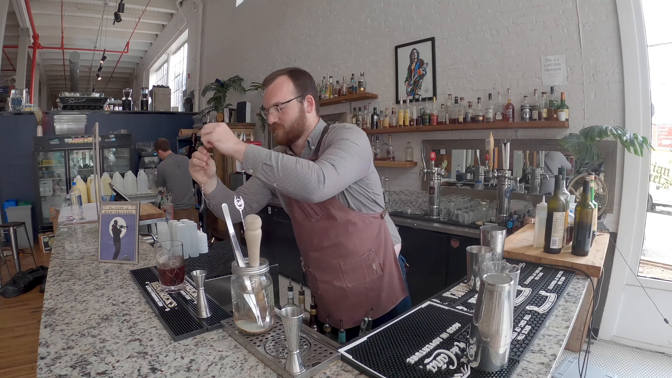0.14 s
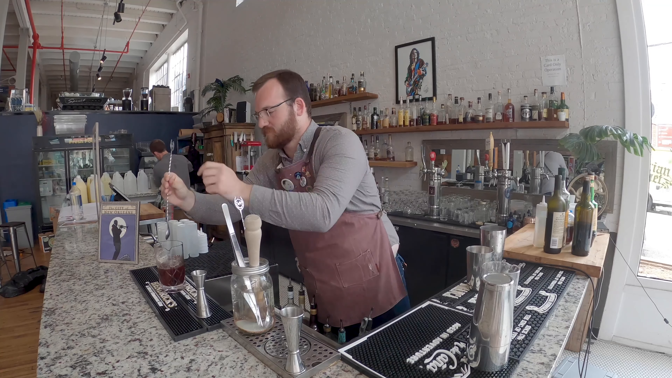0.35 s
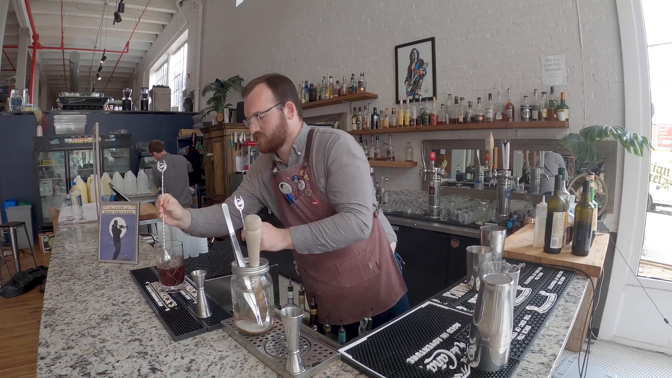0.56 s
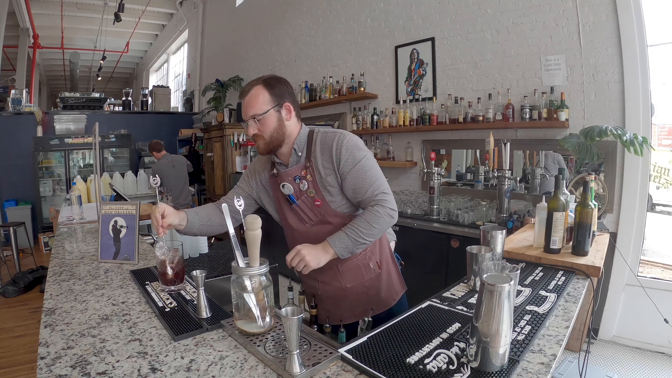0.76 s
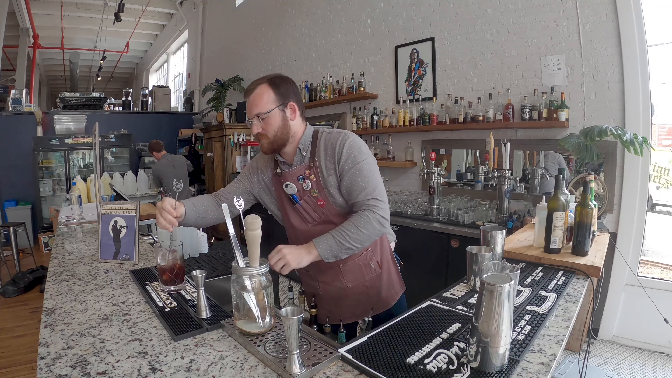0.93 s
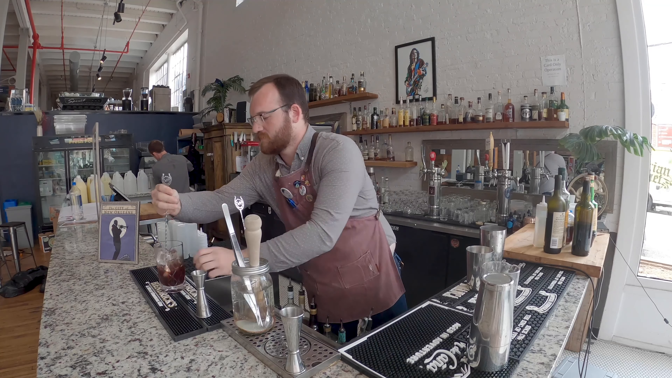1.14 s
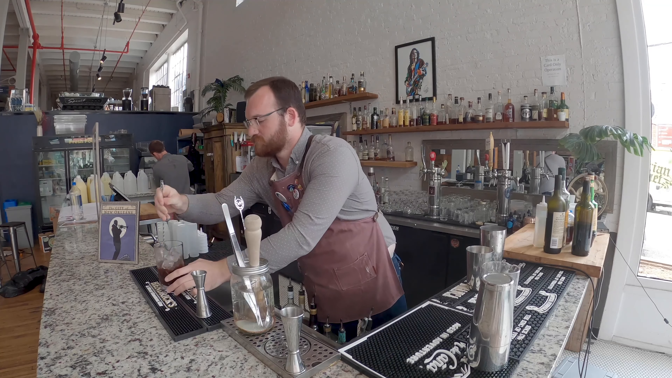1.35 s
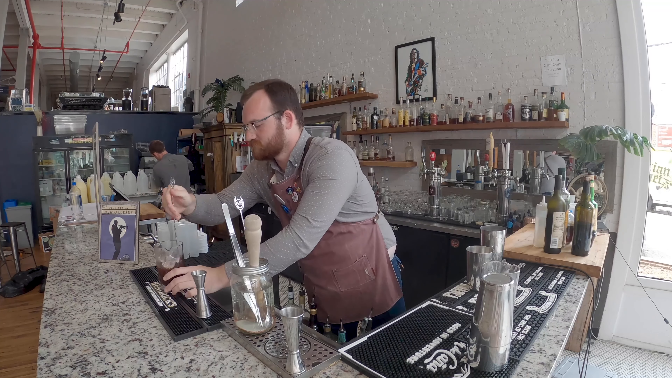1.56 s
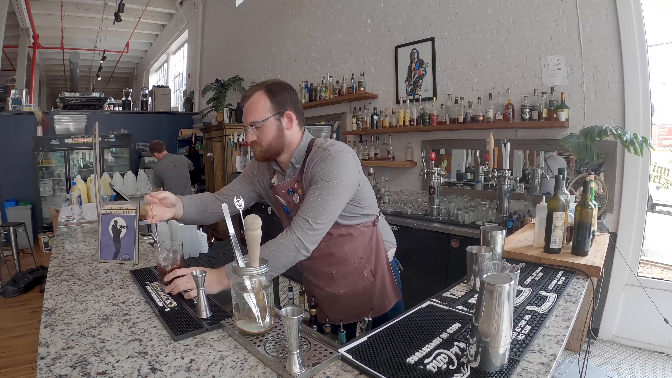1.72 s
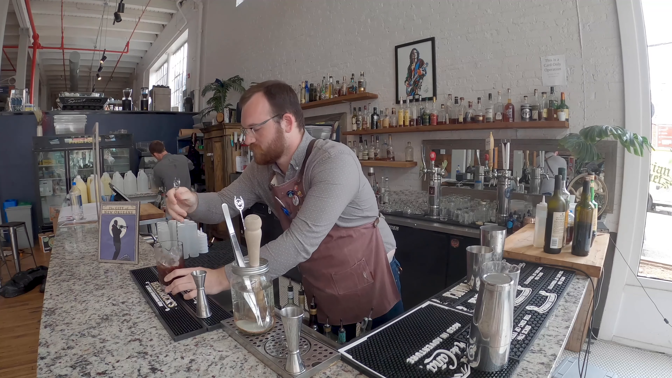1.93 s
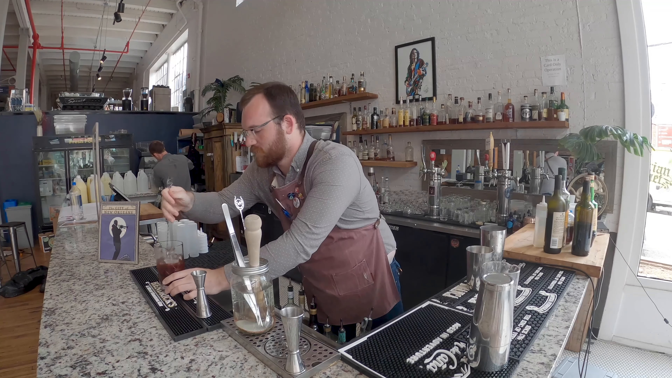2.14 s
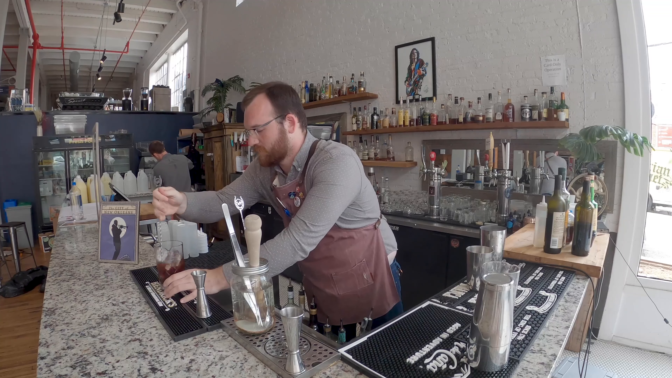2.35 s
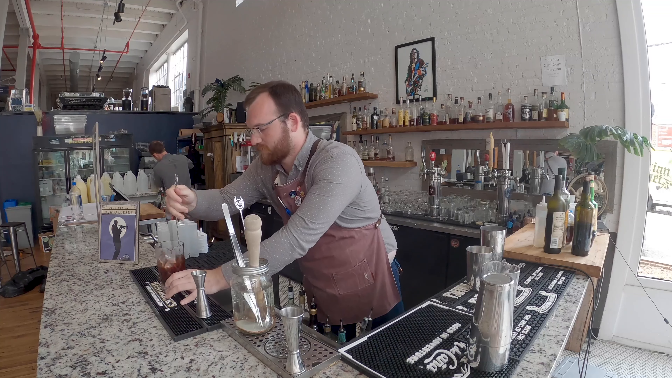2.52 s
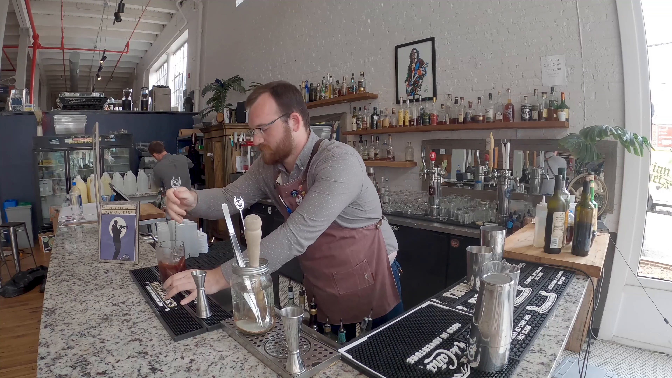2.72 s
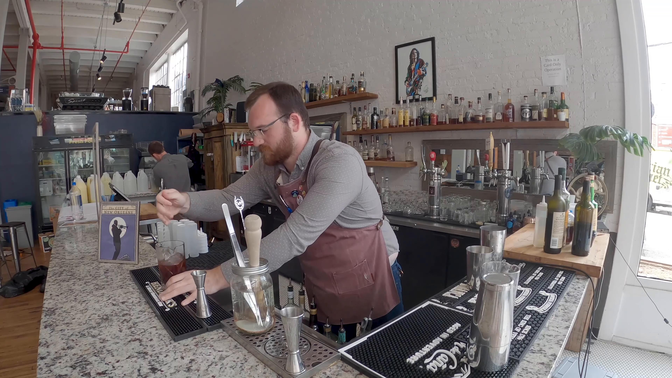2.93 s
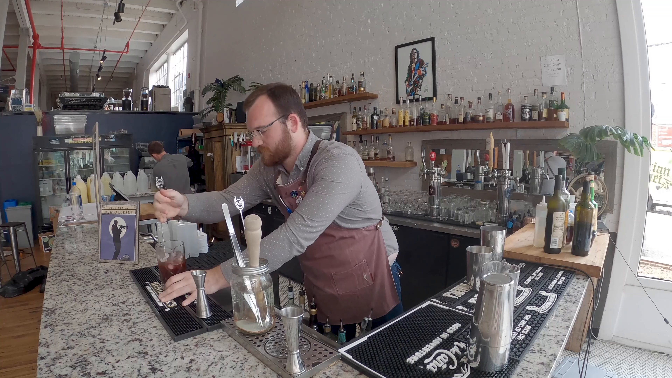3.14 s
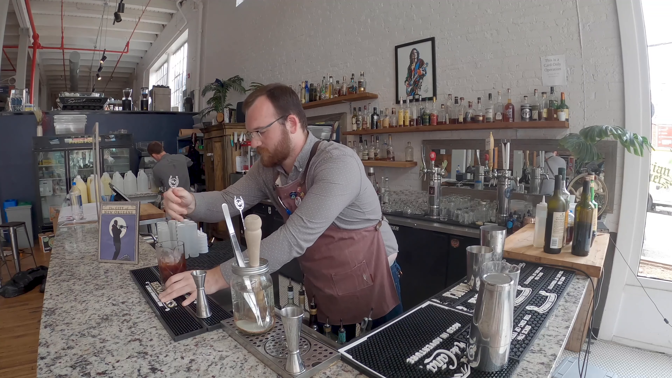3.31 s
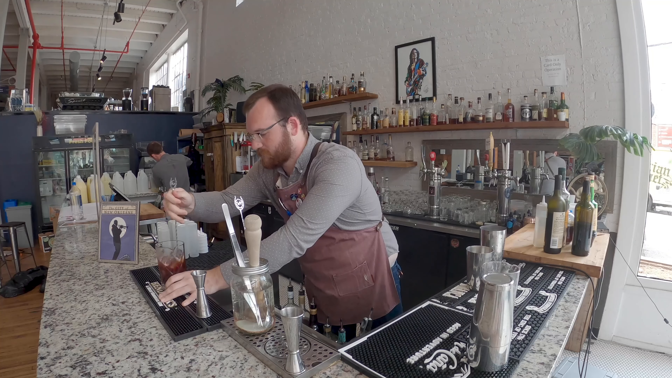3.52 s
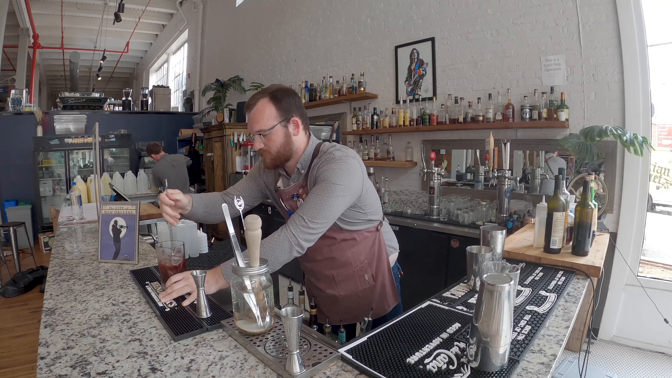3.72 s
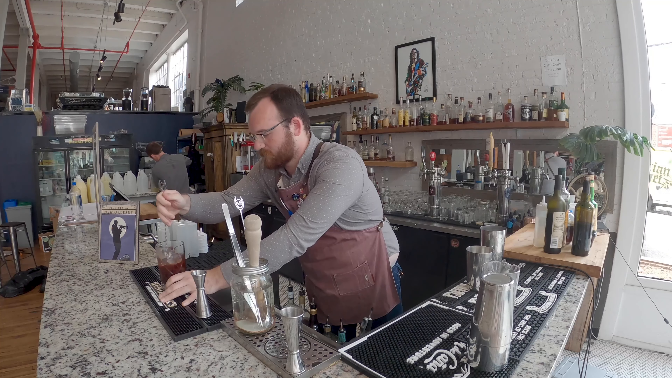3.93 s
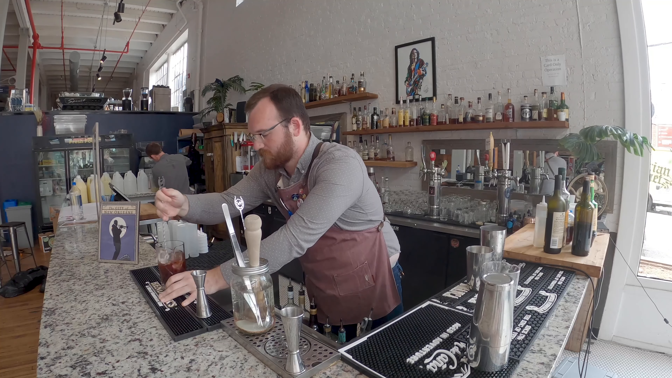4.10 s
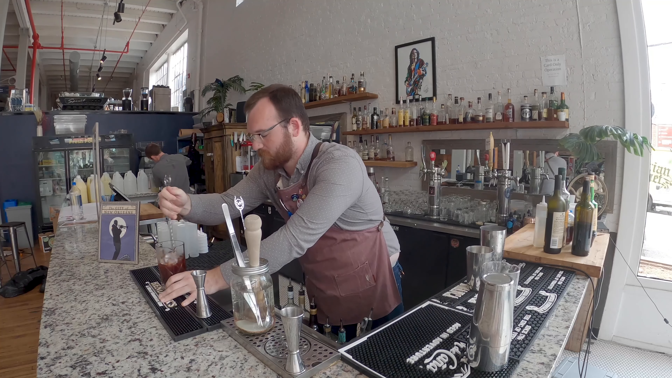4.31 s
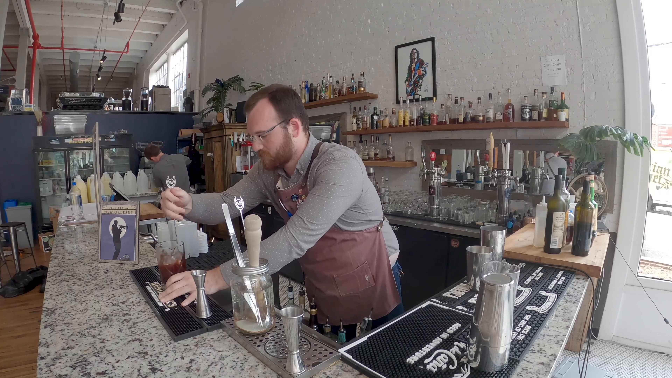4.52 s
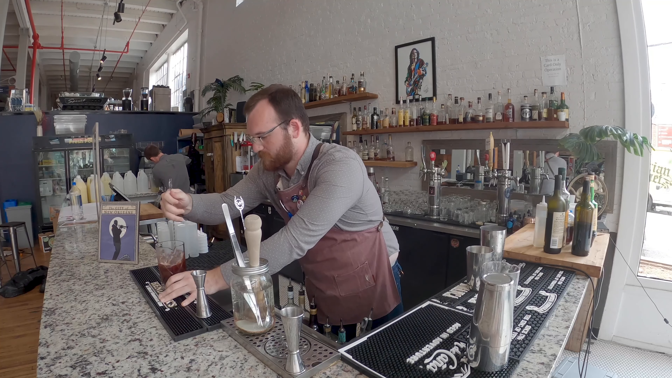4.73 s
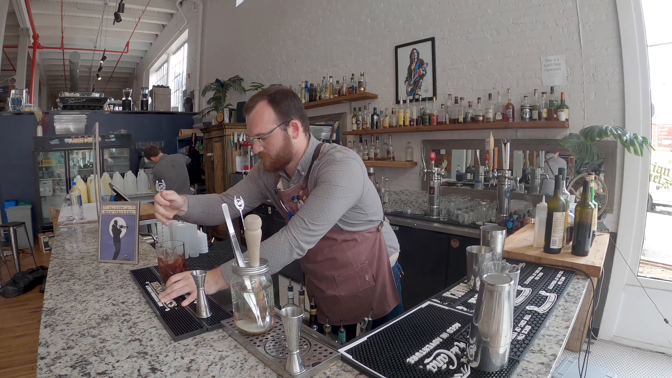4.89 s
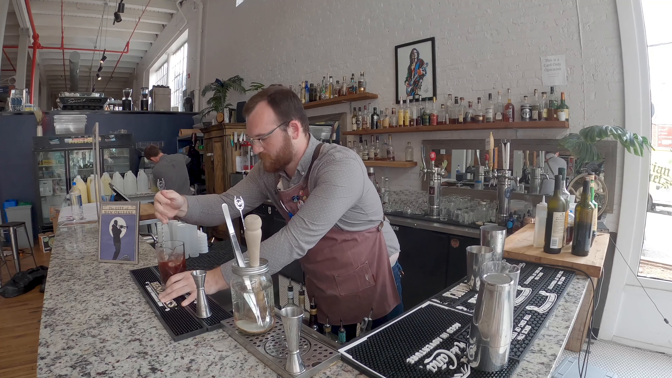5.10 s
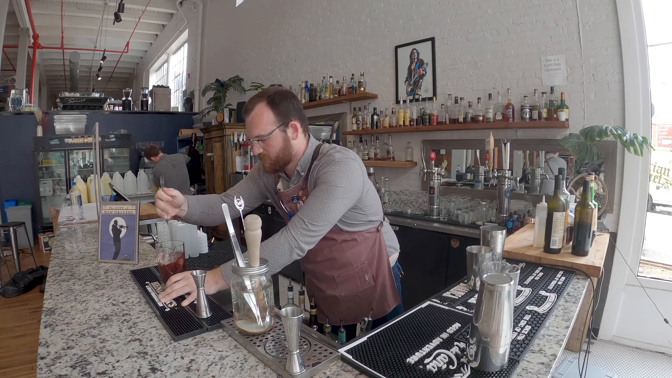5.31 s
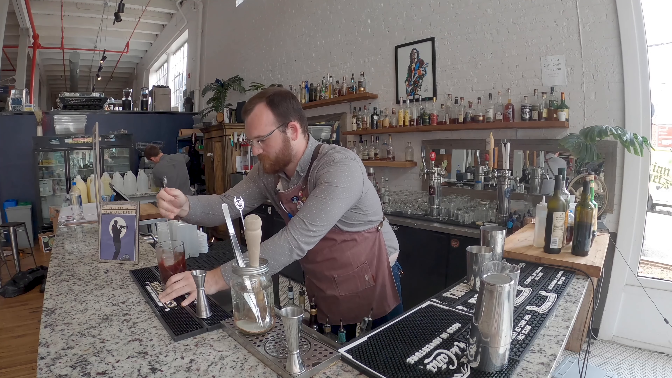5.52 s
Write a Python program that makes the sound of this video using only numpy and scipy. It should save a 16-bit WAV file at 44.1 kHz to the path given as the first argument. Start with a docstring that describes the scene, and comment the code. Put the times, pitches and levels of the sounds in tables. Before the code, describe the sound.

Near silence with a faint spoon ring, then a bright tap on glass and a dense, brittle crunch of ice with a hollow plunk. A brief lull leads into stirring: light, wet, glassy clacks that grow busier and faster, to about four turns a second. Close microphone, short lively room reflections, little bass, low hum near the end.

```python
"""A bar at night-quiet level, microphone close to a mixing glass: a held bar spoon sings faintly at first.
It clinks into the glass, pushes the ice down with a plunk, then stirs, speeding up to about four turns a second.
Noise bursts and struck modes make the cubes knock and ring the glass, lower as the swirling drink climbs its wall.
Small bubbles chirp in the swirl, a hard-walled room answers with decaying noise, and a low hum swells near the end."""
import sys
import numpy as np
from scipy import signal
from scipy.fft import rfft, irfft, next_fast_len
from scipy.io import wavfile
from scipy.ndimage import map_coordinates

SR = 44100
rng = np.random.default_rng(int(sys.argv[2]) if len(sys.argv) > 2 else 0)


def wrap_up_sound(samples):
    """Save the sound to the file named by the first command line argument, as 16-bit audio."""
    columns = np.atleast_2d(samples).T
    # keep every value between -1 and 1, then stretch to whole-number steps
    tamed = np.clip(columns, -1, 1)
    steps = np.round(tamed * 32767).astype(np.int16)
    wavfile.write(sys.argv[1], SR, steps)


N = 244843
T = np.arange(SR // 10) / SR  # time axis of one contact, s
STRIKE = SR // 83  # samples in the first 12 ms of a contact
SPOON_AT = 0.614  # the spoon enters the glass, s
PLUNGE_AT = 0.935  # the push on the ice is at its strongest, s


def amp(db):
    """Decibels to gain."""
    return 10 ** (np.asarray(db) / 20)


def unit(x, count=None):
    """Scale to rms 1 over the first count samples."""
    return x / np.sqrt(np.mean(x[:count] ** 2) + 1e-20)


def along(points, hz):
    """Read (Hz, value) points on a log frequency axis."""
    f, v = np.transpose(points)
    return np.interp(np.log(hz + 1), np.log(f), v)


def curve(points, t):
    """Read (s, value) points at times t."""
    s, v = np.transpose(points)
    return np.interp(t, s, v)


def fade(t60, t=T):
    """Decay by 60 dB in t60 seconds."""
    return np.exp(-np.log(1000) * t / t60)


def coloured(x, gain):
    """Causal (minimum-phase) filter with the given gain of frequency."""
    m = 2 * next_fast_len(len(x) * 2 // 3)
    log_gain = np.log(np.maximum(gain(np.fft.rfftfreq(m, 1 / SR)), 1e-5))
    cepstrum = irfft(log_gain)
    # folding the cepstrum onto positive time makes the filter causal
    cepstrum[1:m // 2] *= 2
    cepstrum[m // 2 + 1:] = 0
    response = np.exp(rfft(cepstrum))
    return irfft(rfft(x, m) * response, m)[:len(x)]


def band(hz, lo_hz, hi_hz, order=8):
    """Gain of a band-pass; a higher order has steeper sides."""
    low_side = 1 + (lo_hz / (hz + 1)) ** (2 * order)
    high_side = 1 + (hz / hi_hz) ** (2 * order)
    return 1 / np.sqrt(low_side * high_side)


def tone(hz, t60, attack, glide=0):
    """One decaying mode, attack in seconds; glide is its relative rise in pitch per second."""
    wave = np.sin(2 * np.pi * hz * (T + glide * T ** 2 / 2))
    return unit(wave * fade(t60) * (1 - np.exp(-T / attack)), count=STRIKE)


def add(track, s, sound):
    """Mix a sound into a track at time s."""
    part = track[max(round(s * SR), 0):][:len(sound)]
    part += sound[:len(part)]


# Spectrum of the quiet room. Each row: frequency in Hz, relative level in dB.
AIR_SPECTRUM = [(15, -18), (25, -13.5), (113, -7.5), (271, -12.5), (344, -13), (382, -15.5), (14000, -38)]
# Swell of the low hum. Each row: time in seconds, level in dB before the trim and the waver.
HUM_SWELL = [(2.8, -73), (3.23, -70), (4.62, -68), (4.71, -53), (4.83, -61.5), (5.29, -51.5), (5.36, -42.5),
             (5.5, -46.5)]
HUM_HZ, HUM_WAVER_HZ = 97, 2  # centre pitch; size of its random drift
BRIEF_HUM_AT, BRIEF_HUM_S, BRIEF_HUM_HZ, BRIEF_HUM_DB = 2.88, 0.071, 163, -57.5


def background(air_db=-66, hum_trim_db=-2, waver_db=1.5):
    """Steady room noise, a low hum that wavers in pitch and level, and a higher one that comes and goes."""
    t = np.arange(N) / SR
    air = unit(coloured(rng.standard_normal(N), lambda hz: amp(along(AIR_SPECTRUM, hz))))
    # ten random knots a second, joined smoothly
    drift, waver = [map_coordinates(knots, [t * 10]) for knots in rng.standard_normal((2, 64))]
    hum = np.sqrt(2) * np.sin(2 * np.pi * np.cumsum(HUM_HZ + HUM_WAVER_HZ * drift) / SR)
    hum_level = amp(curve(HUM_SWELL, t) + hum_trim_db + waver_db * waver)
    brief_level = amp(BRIEF_HUM_DB) * np.exp(-((t - BRIEF_HUM_AT) / BRIEF_HUM_S) ** 2)
    brief = brief_level * np.sin(2 * np.pi * BRIEF_HUM_HZ * t)
    return amp(air_db) * air + brief + hum_level * hum


# Decay of the hard-walled bar. Each row: frequency in Hz, t60 in seconds.
ROOM_DECAY = [(700, 0.51), (1400, 0.72), (3000, 0.43), (7000, 0.6), (12000, 0.32)]


def room(x, gap=0.006, count=14):
    """Diffuse echo of the bar as decaying noise, drawn afresh for each stretch of sound."""
    out = np.zeros(N)
    edges = np.linspace(0, N, count + 1).astype(int)
    for a, b in zip(edges, edges[1:]):
        hz, t, z = signal.stft(rng.standard_normal(SR), SR, nperseg=256)
        decay = fade(along(ROOM_DECAY, hz)[:, None], t)
        tail = signal.istft(z * decay, SR, nperseg=256)[1]
        add(out, a / SR + gap, signal.fftconvolve(x[a:b], tail / np.linalg.norm(tail)))
    return out


# The spoon's own modes, singing in the hand. Each entry: frequency in Hz.
HELD_MODES = [2660, 3590]


def held_spoon(level_db=-65, t60=0.92):
    """The steel spoon in the hand rings out faintly from the start, as decaying sines."""
    t = np.arange(N) / SR
    return amp(level_db) * fade(t60, t) * sum(np.sin(2 * np.pi * hz * t) for hz in HELD_MODES)


# The drink climbing the wall. Each row: time in seconds, height from 0 to 1.
DRINK_HEIGHT = [(1.9, 0.18), (2.9, 0.45), (4.2, 0.83), (5.5, 0.92)]
# The drink loads the glass; rows are low wall mode, high wall mode and deepest knock.
# Each row: frequency at rest in Hz, frequency at full swirl in Hz.
GLASS_LOADING = [(2626, 2570), (4713, 4335), (1367, 830)]
PLUNGE_DEEPENS, PLUNGE_S = 0.503, 0.204  # share by which the knock drops in the push; width of that dip, s
# the moving drink wets the ice and dulls its snap: dB over the crack, before the hardness lift
DRY_SNAP_DB, WET_SNAP_DB, WET_AT, WETTING_S = -13.5, -22, 1.4, 0.39
SWIRL_SNAP_DB = 1  # rise of the snap at full swirl


def swirl(s):
    """Low and high wall mode, deepest knock (Hz) and snap (dB) as the drink stands at time s."""
    rest, full = np.transpose(GLASS_LOADING)
    height = curve(DRINK_HEIGHT, s)
    low_hz, high_hz, deep_hz = rest + (full - rest) * height
    deep_hz *= 1 - PLUNGE_DEEPENS * np.exp(-((s - PLUNGE_AT) / PLUNGE_S) ** 2)
    wet = np.clip((s - WET_AT) / WETTING_S, 0, 1)
    snap_db = DRY_SNAP_DB + (WET_SNAP_DB - DRY_SNAP_DB) * wet + SWIRL_SNAP_DB * height
    return low_hz, high_hz, deep_hz, snap_db


# Each turn of the spoon shoves the small cubes along. Each row: start in seconds, activity in dB.
SPOON_TURNS = [(1.369, -42.5), (1.76, -42.5), (2.08, -40.5), (2.40, -40), (2.70, -41.5), (2.96, -44.5),
               (3.22, -42.5), (3.46, -45.5), (3.73, -40), (3.94, -38.5), (4.18, -39.5), (4.42, -37.5),
               (4.67, -40), (4.92, -43), (5.15, -38), (5.39, -41)]
PLUNGE_DB, PLUNGE_RISE_DB_PER_S, PLUNGE_FALL_DB_PER_S = -26, 72, 102
SHOVE_SAG_DB, SHOVE_SAG_POWER = 16, 3  # drop by the end of a turn; a higher power holds the shove longer


def busy(s):
    """How hard the ice is moving at time s (dB): the push swells and dies; each turn is a shove that sags."""
    starts, db = np.transpose(SPOON_TURNS)
    if s < starts[0]:
        return PLUNGE_DB - max(PLUNGE_RISE_DB_PER_S * (PLUNGE_AT - s), PLUNGE_FALL_DB_PER_S * (s - PLUNGE_AT))
    k = np.searchsorted(starts, s, side="right") - 1
    length = np.diff(starts)[min(k, len(starts) - 2)]
    return db[k] - SHOVE_SAG_DB * ((s - starts[k]) / length) ** SHOVE_SAG_POWER


def bubbles(level_db=-4, glide=3.1, spread=0.16, count=22):
    """The swirl folds in small bubbles, which rise in pitch as they surface."""
    out = np.zeros(N)
    for place, size in rng.random((count, 2)):
        s = SPOON_AT + place * (N / SR - SPOON_AT)
        deep_hz = swirl(s)[2]
        hz = deep_hz * np.exp(spread * (1 + 2 * size))
        add(out, s, amp(busy(s) + level_db) * tone(hz, t60=0.056, attack=0.0024, glide=glide))
    return out


def burst(gain, t60, pitched, hold=0.0064, cube_t60=0.034):
    """Dense micro-impacts as noise; a pitched share rings at two pitches the cube picks from the spectrum."""
    chatter = coloured(rng.standard_normal(len(T)) * fade(t60, np.maximum(T - hold, 0)), gain)
    hz = np.fft.rfftfreq(len(T), 1 / SR)
    power = np.cumsum(gain(hz) ** 2)
    pitches = np.interp(rng.random(2), power / power[-1], hz)  # likelier where the spectrum is strong
    cube = sum(tone(f, cube_t60, attack=0.0005) for f in pitches)
    return np.sqrt(1 - pitched) * unit(chatter, count=STRIKE) + np.sqrt(pitched) * unit(cube, count=STRIKE)


def snap(db, hardness=0.18, edge_hz=9000, droop_db=5):
    """A short, bright click of treble noise; harder blows carry more of it."""
    def gain(hz):
        return band(hz, edge_hz, SR) * amp(-droop_db * np.log2(1 + hz / edge_hz))
    click = coloured(rng.standard_normal(len(T)) * fade(0.046), gain)
    return amp(db + hardness * (db + 75)) * unit(click, count=STRIKE)


# Ice and drink resonating in the glass. Each row: centre in Hz, width in Hz, relative level in dB.
GLASS_CAVITY = [(809, 145, -4), (986, 51, -9.5), (1425, 82.3, -0.5), (1924, 56.6, 3.5), (2319, 57.6, 3.5)]


def cavity(hz):
    """Gain of the resonances of the filled glass, their powers summed."""
    power = 0
    for centre, width, db in GLASS_CAVITY:
        power = power + amp(2 * db) / (1 + (2 * (hz - centre) / width) ** 2)
    return np.sqrt(power)


# Cube on wall. Each row: frequency in Hz, relative level in dB.
WALL_CLACK = [(2000, -18), (2600, 2.5), (3000, 3), (3600, -15.5), (4000, -6.5), (4500, 1), (5200, -17),
              (6000, -25)]
# Brittle ice. Each row: frequency in Hz, relative level in dB.
ICE_CRACK = [(4200, -25), (5000, -4), (5800, 1.5), (7300, -7.5), (8600, -12.5), (10500, -29.5)]


def clink(s, knock_db, low_db, high_db, crack_db, clean_db=6, scatter=0.0275, size_scatter=0.0563,
          pitched=0.62, ring_t60=0.031, clean_t60=0.031):
    """One contact knocks the filled glass, rings its two wall modes and cracks in the treble."""
    low_hz, high_hz, deep_hz, snap_db = swirl(s)
    size = np.exp(size_scatter * rng.standard_normal())  # every cube sounds at its own pitch
    knock = burst(lambda hz: cavity(hz * size) * band(hz, deep_hz, 2330), t60=0.095, pitched=pitched)
    crack = burst(lambda hz: amp(along(ICE_CRACK, hz * size)), t60=0.025, pitched=pitched / 2)
    out = amp(knock_db) * knock + amp(crack_db) * crack
    for db, mode_hz, lo_hz, hi_hz in [(low_db, low_hz, 2350, 3500), (high_db, high_hz, 3500, 5150)]:
        # a clean blow on the wall rings; cube against cube only clacks
        ringing = 1 / (1 + amp(2 * (max(knock_db, crack_db) + clean_db - db)))
        ring_hz = mode_hz * (1 + scatter * (1 - ringing / 2) * rng.standard_normal())
        ring = tone(ring_hz, ring_t60 + clean_t60 * ringing, attack=0.0012)
        clack = burst(lambda hz: amp(along(WALL_CLACK, hz * size)) * band(hz, lo_hz, hi_hz),
                      t60=0.032, pitched=pitched)
        out += amp(db) * (np.sqrt(ringing) * ring + np.sqrt(1 - ringing) * clack)
    return out + snap(crack_db + snap_db)


def jostle(rate=60, level_db=-4.0, spread_db=7.5, colour_db=(-6, -2, -5, -12)):
    """Many faint contacts a second between the distinct ones, as strong as the ice is busy."""
    out = np.zeros(N)
    count = int(rate * (N / SR - SPOON_AT))
    for k, (place, *colour) in enumerate(rng.random((count, 5))):
        s = SPOON_AT + (k + place) / rate
        db = busy(s) + level_db + spread_db * (2 * np.array(colour) - 1)
        add(out, s, clink(s, *(db + colour_db)))  # knock, low mode, high mode, crack
    return out


# The steel spoon strikes the still glass going in. Each row: frequency in Hz, level in dB, t60 in seconds.
SPOON_STRIKE = [(2695, -24.5, 0.041), (4700, -20, 0.077), (7180, -32, 0.033), (10500, -40, 0.039)]
# Distinct contacts of spoon, ice and glass. Each row: start in seconds, strength in dB, hardness in dB,
# knock of the filled glass in dB over the strength.
CONTACTS = [(0.0385, -66.5, 15.5, 11), (0.147, -53, 6, -16), (0.614, -27, 9.5, -10.5),
            (0.7386, -42.5, 6, 5), (0.761, -38, 9.5, 5.5), (0.7761, -41.5, 7, 1.5), (0.8631, -37.5, 3, 0.5),
            (0.878, -35.5, 4.5, -17), (0.8966, -28.5, -1, -14), (0.9102, -32, 7, -8),
            (0.9209, -20, 6, -6.5), (0.9326, -28.5, 7, 1), (0.9603, -30.5, 5, -1), (0.9776, -25.5, 1.5, -3),
            (1.055, -31, 9, -2), (1.332, -53, 9, 3.5), (1.3586, -43.5, 0, -0.5), (1.3787, -42, 15.5, 8.5),
            (1.5291, -50.5, 27, 6), (1.548, -35, 13, -3.5), (1.6147, -40, 9.5, -4.5),
            (1.709, -44.5, -6.5, -3), (1.7893, -39, -3, -1.5), (1.844, -48.5, 15, -9),
            (1.9089, -39.5, -15, -16), (1.925, -42.5, 0, -1), (2.0008, -46, -8, 8), (2.046, -50, -12, 10.5),
            (2.08, -28.5, -16.5, -14.5), (2.1104, -35, -13, -11), (2.1705, -34.5, -13.5, -8),
            (2.2543, -52, 6, 14), (2.41, -38, 1.5, -4.5), (2.4846, -35.5, -16, -6), (2.5502, -34, 1.5, -11),
            (2.6054, -37.5, -5.5, -8), (2.656, -47, 9, -3.5), (2.719, -38.5, 7, -0.5),
            (2.7613, -31.5, -4.5, -4), (2.7724, -35.5, -30, -23), (2.834, -40.5, -19, -4),
            (2.8845, -29.5, 2.5, -10), (2.8967, -30.5, -1, -12.5), (2.962, -34.5, 4.5, -2),
            (3.053, -48.5, 15.5, 2), (3.1142, -36, -6, -0.5), (3.222, -44, 1.5, 3.5),
            (3.2512, -40, 18.5, -14), (3.3853, -41, -10, 1.5), (3.464, -29, 6, -10.5),
            (3.5182, -40, 7, -3.5), (3.548, -35.5, 4, -2), (3.7033, -30, 3.5, -16.5), (3.765, -38, 1, -13),
            (3.8019, -26.5, -5, -11.5), (3.9, -43, 1, 6.5), (3.9736, -31.5, 2, -13), (3.9861, -38.5, 4, -9),
            (4.0341, -35.5, -3.5, -2), (4.0704, -41, -6, 3), (4.173, -27.5, -7, -10), (4.203, -34, 0, -3),
            (4.2117, -36, 4, -2.5), (4.2461, -34, 8.5, -7), (4.298, -38.5, -0.5, 1), (4.4008, -39, -13, -1),
            (4.428, -49, 14, -6), (4.454, -32.5, -2, -14), (4.4649, -28, -3.5, -7), (4.666, -45.5, 9, -2),
            (4.6757, -36, -9, -3), (4.7032, -33.5, 10, -20), (4.7524, -35, -4, -2),
            (4.783, -20.5, -3.5, -10), (4.8389, -33, -5, -3), (4.9359, -34, -1.5, -9.5),
            (4.9704, -32.5, 7, -6.5), (5.01, -32.5, -4.5, -4.5), (5.068, -33.5, 2, -4),
            (5.1489, -28.5, 0, -10.5), (5.1772, -32.5, -8.5, -5), (5.193, -31, 3.5, -4),
            (5.3906, -37, 5.5, -6), (5.4094, -33.5, -8, -3), (5.4228, -32, 3.5, -13),
            (5.447, -36.5, 0, -3.5)]
# A contact's share in the low wall mode, the high wall mode and the crack.
# Each row: level in dB over its strength, slope in dB per dB of hardness.
CONTACT_SHARES = [(0.5, -0.27), (-3, 0.6278), (-9, 1)]
# Air pockets ringing in the drink. Each row: start in seconds, frequency in Hz, level in dB before the trim,
# t60 in seconds.
AIR_POCKETS = [(.924, 731, -33, 0.13), (.935, 863, -21.5, 0.053), (2.186, 2270, -24, 0.024),
               (2.413, 2257, -31.5, 0.035), (3.121, 1337, -35.5, 0.055), (4.546, 1330, -43, 0.035),
               (4.91, 1300, -38, 0.03), (5.232, 777, -40, 0.063)]


def ice(plunk_trim_db=-1, rebound_db=-16, rebound_gap=0.016, rebound_top_db=-33):
    """The spoon's entry, distinct contacts with a rebound each, and air pockets the cubes drag under."""
    out = np.zeros(N)
    add(out, SPOON_AT, sum(amp(db) * tone(hz, t60, attack=0.00126) for hz, db, t60 in SPOON_STRIKE))
    for s, strength_db, hardness_db, knock_db in CONTACTS:
        levels = [strength_db + knock_db]
        levels += [strength_db + db + slope * hardness_db for db, slope in CONTACT_SHARES]
        add(out, s, clink(s, *levels))
        # the drink brakes the cube, so even a hard blow comes back softly
        later = s + rebound_gap * (0.5 + 2 * rng.random())
        add(out, later, amp(rebound_db) * clink(later, *np.minimum(levels, rebound_top_db)))
    for s, hz, db, t60 in AIR_POCKETS:
        add(out, s, amp(db + plunk_trim_db) * tone(hz, t60, attack=0.011))
    return out


def scene(room_db=-12.5, lowest_hz=540):
    """The glass close by, its echo, the held spoon and the background."""
    # so small a vessel radiates no bass
    glass = coloured(ice() + jostle() + bubbles(), lambda hz: band(hz, lowest_hz, SR, order=3))
    return (glass + amp(room_db) * room(glass) + held_spoon() + background())[None]


def record(dry, top_hz=15900, slope_hz=400):
    """Band limit of the sound: the treble ends in a narrow slope centred on top_hz."""
    m = next_fast_len(N + SR // 2)
    edge = np.clip((top_hz - np.fft.rfftfreq(m, 1 / SR)) / slope_hz + 0.5, 0, 1)
    return irfft(rfft(dry, m) * edge, m)[:, :N]


dry = scene()
out = record(dry)
wrap_up_sound(out)
```